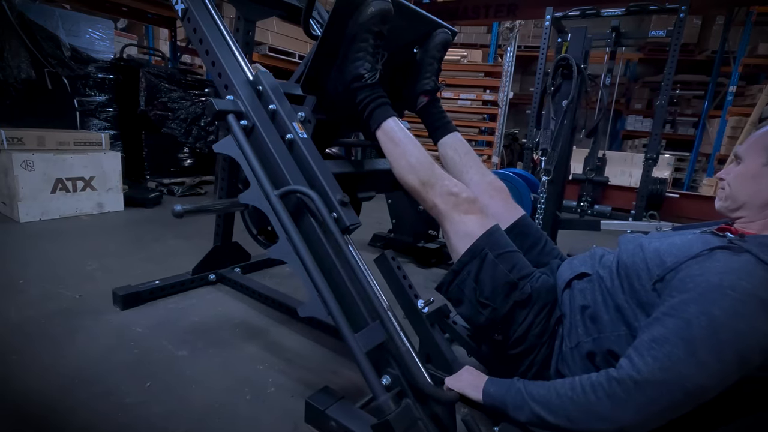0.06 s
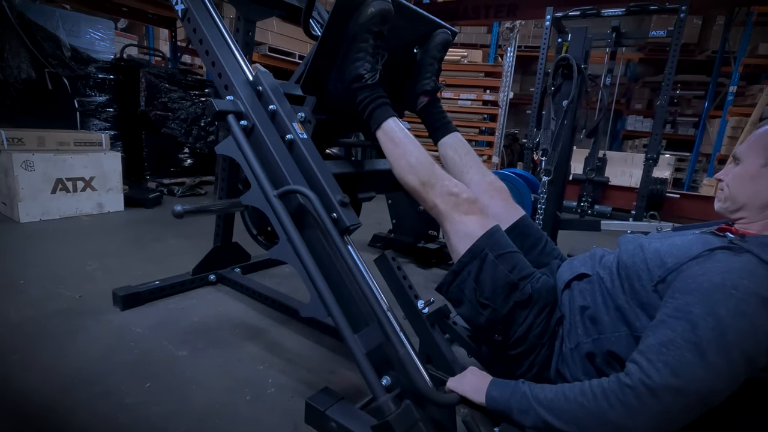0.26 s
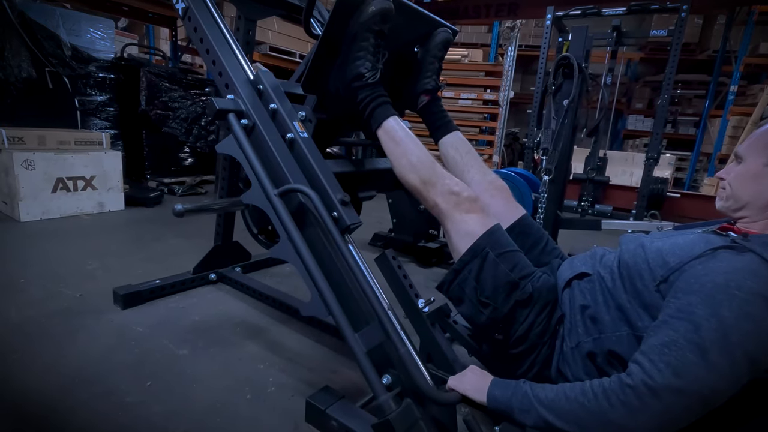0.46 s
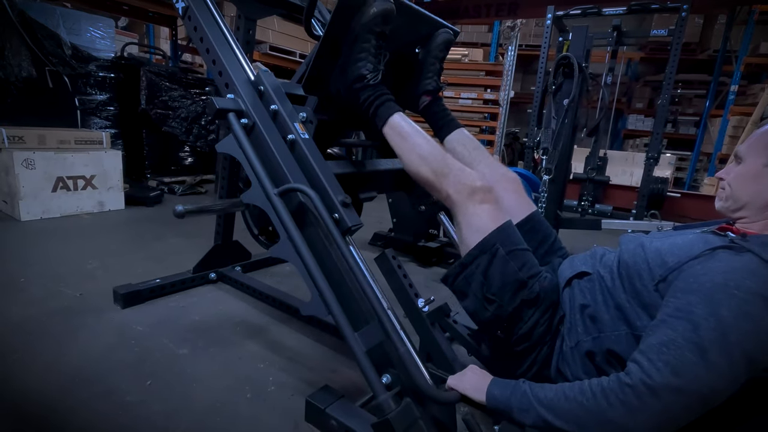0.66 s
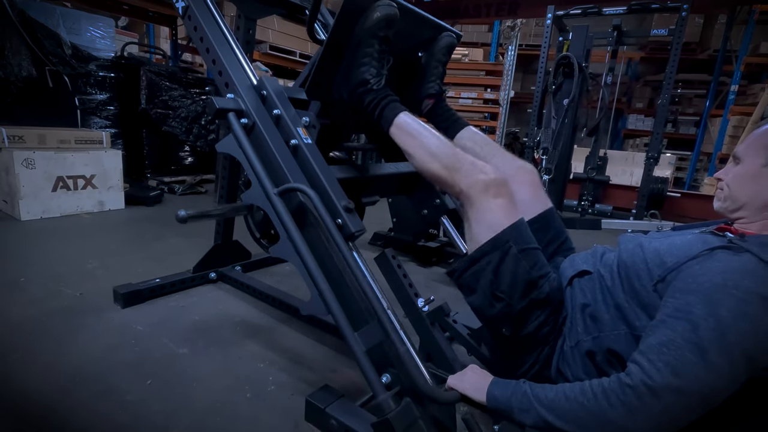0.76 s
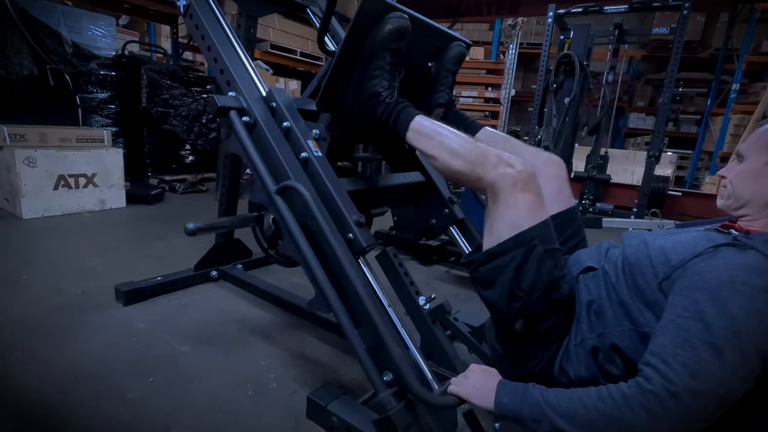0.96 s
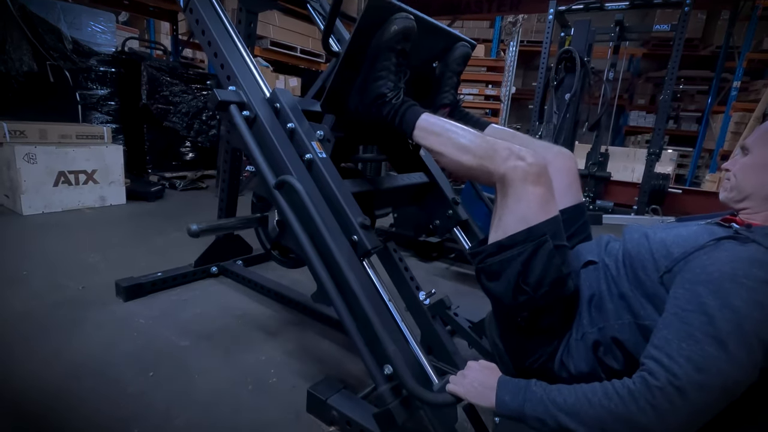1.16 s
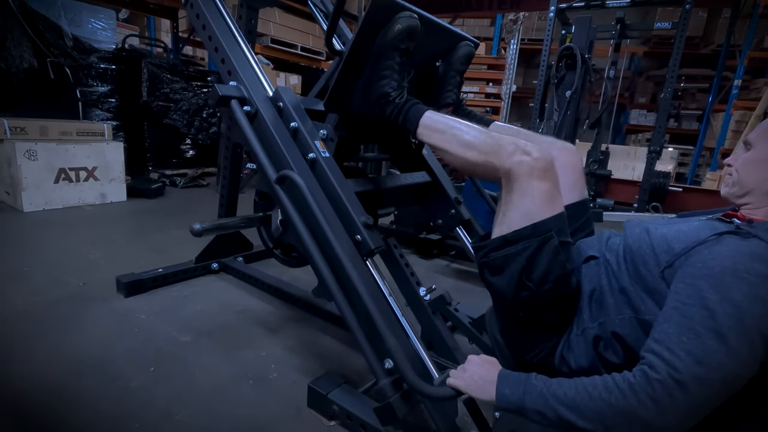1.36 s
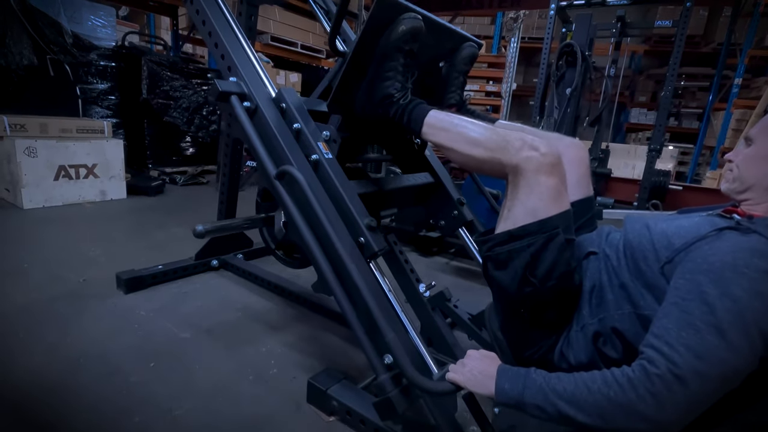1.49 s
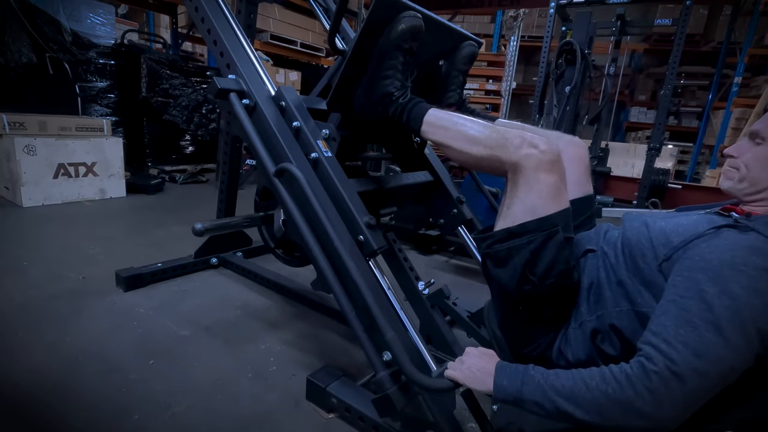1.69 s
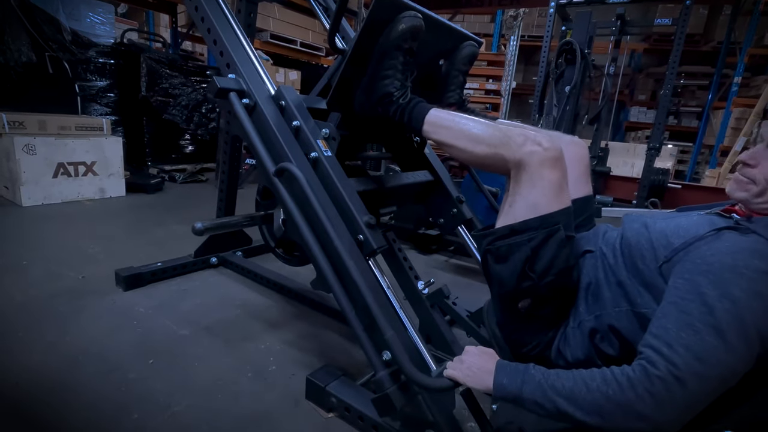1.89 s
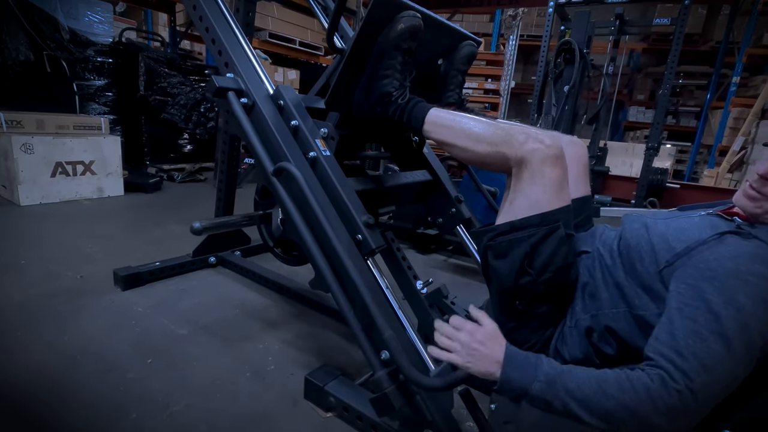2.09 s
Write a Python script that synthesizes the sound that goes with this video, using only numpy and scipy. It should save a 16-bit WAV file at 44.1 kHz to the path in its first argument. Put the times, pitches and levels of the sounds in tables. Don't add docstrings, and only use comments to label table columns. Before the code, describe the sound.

Heavy gym machine metal clanking, with two loud slams and a rattling, ringing steel frame in a hall.

```python
import sys
import numpy as np
from scipy import signal
from scipy.fft import rfft, irfft, next_fast_len
from scipy.io import wavfile
from scipy.ndimage import map_coordinates

SR = 44100
rng = np.random.default_rng(int(sys.argv[2]) if len(sys.argv) > 2 else 0)


def boost(x):
    u = np.asarray(x, float) / 20
    return 10 ** u


def wrap_up_sound(samples):
    columns = np.atleast_2d(samples).T
    tamed = np.clip(columns, -1, 1)
    steps = np.round(tamed * 32767).astype(np.int16)
    wavfile.write(sys.argv[1], SR, steps)


N = 94374
T = np.arange(SR) / SR


def unit(x):
    return x / np.sqrt(np.mean(x ** 2) + 1e-20)


def along(points, hz):
    f, v = np.transpose(points)
    return np.interp(np.log(hz + 1), np.log(f + 1), v)


def wobble(rate, size=N):
    knots = rng.standard_normal(int(size * rate / SR) + 4)
    return map_coordinates(knots, [np.arange(size) * rate / SR])


def filtered(x, response):
    m = next_fast_len(N + SR // 2)
    spectrum = rfft(x, m) * response(np.fft.rfftfreq(m, 1 / SR))
    return irfft(spectrum, m)[..., :N]


def noise(spectrum):
    white = rng.standard_normal(N)
    return unit(filtered(white, lambda hz: boost(along(spectrum, hz))))


def place(out, start, sound):
    out[round(start * SR):][:SR] += sound


def drift():
    return np.repeat(wobble(16 * 25, SR // 16 + 1), 16)[:SR]


def ring(modes, waver=0, flutter_db=0):
    rows = []
    for k, (hz, db, t60) in enumerate(modes):
        decay = boost(db - 60 * T / t60 + flutter_db * drift())
        tone = np.sin(2 * np.pi * hz * T + waver * drift())
        rows.append((-1) ** k * decay * tone)
    return np.array(rows)


# frequency in Hz, t60 in seconds.
HALL_T60 = [(100, 0.65), (500, 0.43), (2000, 0.55), (6000, 0.46), (14000, 0.18)]


def hall(x):
    hz, t, z = signal.stft(rng.standard_normal(SR), SR, nperseg=256)
    fading = z * boost(-60 * t / along(HALL_T60, hz)[:, None])
    tail = signal.istft(fading, SR, nperseg=256)[1]
    delayed = np.pad(x, (round(.012 * SR), 0))
    return signal.fftconvolve(delayed, tail / np.linalg.norm(tail))[:N]


def radiated(x):
    return filtered(x, lambda hz: (1j * hz / (100 + 1j * hz)) ** 3)


def part(contacts, modes, clatter, ring_db, hall_db):
    rung, chatter = np.zeros(N + SR), np.zeros(N + SR)
    body = ring(modes, waver=.8, flutter_db=2)
    mode_hz = np.array(modes)[:, 0]
    favour_db, favour_octaves, scatter_db = 8.5, 0.3, 3.5
    for start, db, rise, t60, best_hz in contacts:
        swell = boost(db) * (1 - np.exp(-T / rise)) ** 2
        near = np.exp(-(np.log2(mode_hz / best_hz) / favour_octaves) ** 2)
        scatter = scatter_db * rng.standard_normal(len(mode_hz))
        place(rung, start, swell * (boost(favour_db * (near - 0.5) + scatter) @ body))
        place(chatter, start, swell * boost(-60 * T / t60))
    grain = boost(5.5 + 0.38 * wobble(150) + 0.55 * wobble(30.3))
    dry = radiated(boost(ring_db) * rung[:N] + chatter[:N] * grain * noise(clatter))
    return dry + boost(hall_db) * hall(dry)


# frequency in Hz, level in dB per Hz.
AIR_COLOUR = [(20, -25), (70, -0.5), (220, -5.5), (330, -16), (800, -17.5), (1500, -27.5), (2200, -38.5),
              (15500, -47.5)]


def air():
    return boost(-52 + 2.5 * wobble(24)) * noise(AIR_COLOUR)


# start in seconds, level in dB, rise in seconds, chatter t60 in seconds,
# best excited pitch in Hz.
HANDLE_CONTACTS = [
    (.243, -43.5, 0.0042, 0.35, 2000),
    (.2585, -19, 0.0017, 0.08, 880),
    (.266, -18.5, 0.0033, 0.13, 620),
    (.305, -26, 0.0036, 0.15, 1126),
    (.33, -26, 0.013, 0.1, 220),
    (.38, -35, 0.0087, 0.097, 445),
]
# frequency in Hz, level in dB, t60 in seconds.
HANDLE_RINGING = [(178.6, -3, 0.47), (236, -8, 0.35), (310, -5.5, 0.33), (445, 3.5, 0.27),
                  (620, -19, 0.028), (690, -13, 0.24), (850, -2, 0.059), (1020, -19, 0.73),
                  (1124, -8, 0.19), (1690, -15, 0.74), (1830, -27, .15), (2270, -21, 0.26),
                  (3260, -21, 0.15), (4540, -42, 0.2)]
# frequency in Hz, level in dB per Hz.
HANDLE_COLOUR = [(150, -23), (500, -0.5), (1000, -2), (2500, -20), (4700, -37.5), (5700, -50),
                 (8500, -44.5), (11000, -63)]


def handles():
    return part(HANDLE_CONTACTS, HANDLE_RINGING, HANDLE_COLOUR, ring_db=-8, hall_db=-8.5)


# start in seconds, pitch in Hz, level in dB, t60 in seconds.
LOOSE_KNOCKS = [(.258, 445, -15.5, 0.17), (.259, 1200, -21, 0.085), (.259, 1830, -22, 0.13),
                (.268, 615.3, -4, 0.099), (.27, 915, -13.5, .12), (.272, 737, -16, 0.1),
                (.295, 690, -20, 0.12), (.298, 1128, -19.5, .12), (.3, 930, -29, 0.056),
                (.385, 441.6, -28, 0.15), (.395, 640, -22, .1), (.395, 1020, -36, 0.18),
                (.42, 690, -36.5, 0.35), (.475, 428, -39.5, 0.24), (.52, 432, -39, 0.11),
                (1.127, 1047, -17, 0.12), (1.13, 2065, -26, .12), (1.138, 348.3, -20.5, .17),
                (1.14, 1260, -18, 0.13), (1.145, 699, -10.5, 0.14), (1.155, 1020, -15, 0.16),
                (1.16, 169, -25.5, 0.22), (1.168, 1280, -22, .08), (1.192, 415, -20.5, 0.14),
                (1.195, 659, -16.5, 0.088), (1.215, 1013, -24, 0.23), (1.25, 1580, -34, .25),
                (1.272, 419.7, -38, 0.32), (1.312, 672, -31, 0.11), (1.342, 1038, -28.5, 0.078),
                (1.385, 1050, -41, .08), (1.632, 480.4, -8, 0.18), (1.634, 437, -11, 0.076),
                (1.64, 764, -16, 0.16), (1.68, 314.6, -13, 0.12), (1.682, 416, -10, 0.14),
                (1.71, 782, -15, 0.11), (1.708, 384, -11.5, 0.1), (1.73, 404, -13.5, 0.12),
                (1.738, 1007, -17.5, 0.16), (1.8, 236.4, -15.5, 0.5), (1.806, 462, -8, 0.081),
                (1.81, 771, -14, 0.11), (1.835, 796, -16, 0.11), (1.858, 627, -10.5, 0.1),
                (1.86, 986, -9, 0.1), (1.88, 426, -9, 0.11), (1.882, 799, -12, 0.11),
                (1.905, 320.7, -21.5, 0.44), (1.935, 427.3, -23.5, 0.38)]
# start in seconds, pitch in Hz, level in dB, t60 in
# seconds.
MORE_KNOCKS = [
    (.75, 750, -53, .1),
    (.796, 450, -42, 0.089),
    (.798, 695, -43, .08),
    (.822, 560, -40, .08),
    (.84, 1210, -47, .1),
    (.283, 620, -15, .08),
    (1.17, 565, -30, .08),
    (1.7, 237.4, -23, .3),
    (1.85, 239.4, -23, 0.26),
]


def knocks():
    out = np.zeros(N + SR)
    rows = LOOSE_KNOCKS + MORE_KNOCKS
    notes = ring([row[1:] for row in rows], waver=.4, flutter_db=1)
    swell = (1 - np.exp(-T / 0.0041)) ** 2
    for row, note in zip(rows, notes):
        place(out, row[0], note * swell)
    return out[:N] + boost(-18) * hall(out[:N])


# start in seconds, level in dB, rise in seconds, chatter t60 in seconds,
# best excited pitch in Hz.
SHIFT_CONTACTS = [
    (.745, -50, 0.0045, 0.51, 740),
    (.793, -37.5, 0.0056, 0.11, 695),
    (.82, -38, 0.0065, 0.14, 507),
    (.9, -60, 0.02, 0.062, 600),
]
# frequency in Hz, level in dB, t60 in seconds.
SHIFT_RINGING = [(450, 5.5, 0.12), (568, 1, 0.054), (695, 4.5, 0.096), (814, -15, 0.048), (1280, -8, 0.073),
                 (1436, -4, 0.073)]
# frequency in Hz, level in dB per Hz.
SHIFT_COLOUR = [(200, -19.5), (450, 1), (750, -4.5), (1000, -14), (1250, -7.5), (2000, -30.5), (3500, -32),
                (6500, -45.5)]


def shift():
    return part(SHIFT_CONTACTS, SHIFT_RINGING, SHIFT_COLOUR, ring_db=1.3, hall_db=-4.5)


# time in seconds, level in dB.
ROLL_LEVEL = [(.88, -84), (.95, -67), (1.05, -64.5), (1.11, -60.5), (1.2, -69.5), (1.95, -78),
              (2.14, -52.5)]
# frequency in Hz, level in dB per Hz.
ROLL_COLOUR = [(900, -120), (1500, 4), (4000, -5), (12000, -8), (15500, -10)]
# time in seconds, pitch in Hz, level in dB.
SQUEAL_PATH = [
    (.88, 800, -63),
    (1.0, 810, -57),
    (1.06, 830, -53),
    (1.095, 845, -52),
    (1.112, 850, -75),
]


def rolling():
    t = np.arange(N) / SR
    s, hz, db = np.transpose(SQUEAL_PATH)
    pitch = np.interp(t, s, hz) * (1 + .04 * wobble(90))
    note = np.sin(2 * np.pi * np.cumsum(pitch) / SR)
    note_db = np.interp(t, s, db, left=-120, right=-120) + 4 * wobble(60)
    hiss_db = np.interp(t, *np.transpose(ROLL_LEVEL)) + 1.1 * wobble(18)
    return boost(hiss_db) * noise(ROLL_COLOUR) + boost(note_db) * note


# start in seconds, level in dB, rise in seconds, chatter t60 in seconds,
# best excited pitch in Hz.
SLED_CONTACTS = [
    (1.1265, -19, 0.0015, 0.11, 2500),
    (1.138, -19.5, 0.0062, 0.12, 1017),
    (1.152, -24, 0.015, 0.062, 690),
    (1.17, -26, 0.0083, 0.1, 820),
    (1.2, -29.5, 0.0035, 0.13, 1017),
    (1.31, -47.5, 0.017, 0.25, 680),
]
# frequency in Hz, level in dB, t60 in seconds.
SLED_RINGING = [(165, -2, 0.21), (341, 6, 0.16), (434, -1, 0.33), (691, -2, 0.28), (820, -18, 0.11),
                (1017, -2, 0.37), (1174, 4, 0.28), (1580, -20, .35), (2070, -22, 0.18), (2000, -16, .22)]
# frequency in Hz, level in dB per Hz.
SLED_COLOUR = [(100, -26), (300, -8), (750, -1), (1300, -5), (2500, -10), (6000, -27.5), (7000, -43.5),
               (15500, -54.5)]


def sled():
    return part(SLED_CONTACTS, SLED_RINGING, SLED_COLOUR, ring_db=-13.5, hall_db=-8)


# start in seconds, level in dB, pitch in Hz, t60 in seconds.
SMALL_TICKS = [
    (1.4118, -21.5, 1540, .011),
    (1.4112, -32, 3300, .005),
    (1.4112, -49, 7000, .004),
    (2.095, -30, 4000, .0027),
    (2.095, -38, 7000, .0025),
    (2.121, -34.5, 7700, .0035),
    (2.121, -42, 11500, .003),
    (2.1328, -21.5, 3800, .0015),
    (2.133, -30, 11500, .003),
]


def ticks():
    out = np.zeros(N + SR)
    for start, db, hz, t60 in SMALL_TICKS:
        partials = [(hz, db, t60), (1.43 * hz, db - 8, t60), (0.764 * hz, db - 1.5, t60)]
        place(out, start, ring(partials).sum(0))
    dry = filtered(out[:N], lambda hz: (1j * hz / (700 + 1j * hz)) ** 2)
    return dry + boost(-31) * hall(dry)


# start in seconds, level in dB, rise in seconds, chatter t60 in seconds,
# best excited pitch in Hz.
PIN_CONTACTS = [
    (1.417, -48, 0.0038, 0.15, 1600),
]
# frequency in Hz, level in dB, t60 in seconds.
PIN_RINGING = [(1600, 6, 0.14), (3700, -8, .1)]
# frequency in Hz, level in dB per Hz.
PIN_COLOUR = [(600, -30), (1500, 8), (2600, -5), (3900, -1), (5500, -23), (9000, -36)]


def pin():
    return part(PIN_CONTACTS, PIN_RINGING, PIN_COLOUR, ring_db=-4, hall_db=-21)


# start in seconds, level in dB, rise in seconds, chatter t60 in seconds,
# best excited pitch in Hz.
FRAME_CONTACTS = [
    (1.604, -34.5, 0.0012, 0.027, 800),
    (1.612, -13, 0.0011, 0.094, 810),
    (1.632, -20.5, 0.0027, 0.074, 477),
    (1.68, -16, 0.0041, 0.11, 373),
    (1.722, -24, 0.0037, 0.32, 1014),
    (1.791, -16.5, 0.001, 0.094, 450),
    (1.812, -26.5, 0.0072, 0.19, 450),
    (1.865, -15.5, 0.0047, 0.14, 664),
    (1.943, -33.5, 0.015, 0.76, 319),
]
# frequency in Hz, level in dB, t60 in seconds.
FRAME_RINGING = [(143.7, -9, 0.32), (235, -5, 0.13), (319, 6.5, 0.39), (425, -1, 0.3), (454.5, 4, 0.21),
                 (664, -29, 0.13), (697, -1, 0.17), (810, -38, 0.18), (1014, -21, .15), (1176, -13, 0.2),
                 (1405, -37, 0.12), (1630, -22, 0.27), (2220, -31, .18), (2110, -16.5, 0.12)]
# frequency in Hz, level in dB per Hz.
FRAME_COLOUR = [(60, -12), (200, -3), (450, 0.5), (800, -2.5), (1600, -6), (3000, -18.5), (7000, -39),
                (9000, -52), (15000, -50)]


def frame():
    return part(FRAME_CONTACTS, FRAME_RINGING, FRAME_COLOUR, ring_db=-8.5, hall_db=-2.36)


# start in seconds, peak level in dB.
STOP_SLAMS = [
    (1.612, 5),
    (1.7915, 0.5),
]
# frequency in Hz, level in dB, t60 in seconds.
STOP_RINGING = [(620, -3, 0.021), (771, 1, 0.035), (1366, -8, 0.027), (1622, -11, 0.023), (2184, -8, 0.023),
                (3740, -26, 0.044)]
# frequency in Hz, level in dB per Hz.
CRACK_COLOUR = [(300, -6), (1500, 4), (5000, -12), (8000, -23.5), (15500, -45)]


def slams():
    out = np.zeros(N + SR)
    for start, db in STOP_SLAMS:
        crack = boost(-14 - 60 * T / 0.047) * noise(CRACK_COLOUR)[:SR]
        thud = boost(-51 - 60 * T / 0.046) * np.sin(2 * np.pi * 46.5 * T)
        push = thud * T / 0.0092
        onset = 1 - np.exp(-T / 0.0026)
        place(out, start, boost(db + 3) * ((ring(STOP_RINGING).sum(0) + push) * onset + crack))
    return out[:N] + boost(-7) * hall(out[:N])


def scene():
    mid = air() + handles() + knocks() + shift() + rolling() + sled() + ticks() + pin() + frame() + slams()
    side_colour = [(60, -28), (160, -16), (300, -9), (700, -14), (1500, -5), (3000, 0), (6000, 5), (13000, 15)]
    wandering = mid * unit(wobble(400))
    side = boost(-27) * filtered(wandering, lambda hz: boost(along(side_colour, hz)))
    return np.array([mid + side, mid - side])


def roll_off(x):
    return signal.sosfilt(signal.butter(12, 15600, fs=SR, output="sos"), x)


def record(dry):
    hardness = 14
    clipped = dry / (1 + np.abs(dry) ** hardness) ** (1 / hardness)
    top_end = [(14800, 0), (15600, -20), (16500, -60)]  # (Hz, dB)
    mix = filtered(clipped, lambda hz: boost(along(top_end, hz)))
    return roll_off(mix)


dry = scene()
out = record(dry)
wrap_up_sound(out)
```